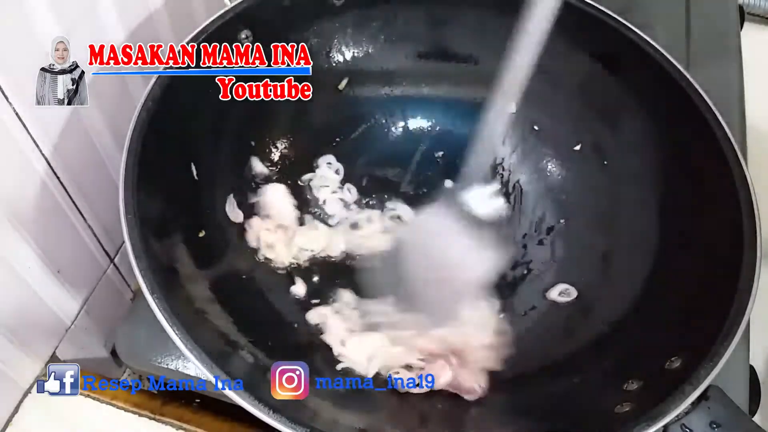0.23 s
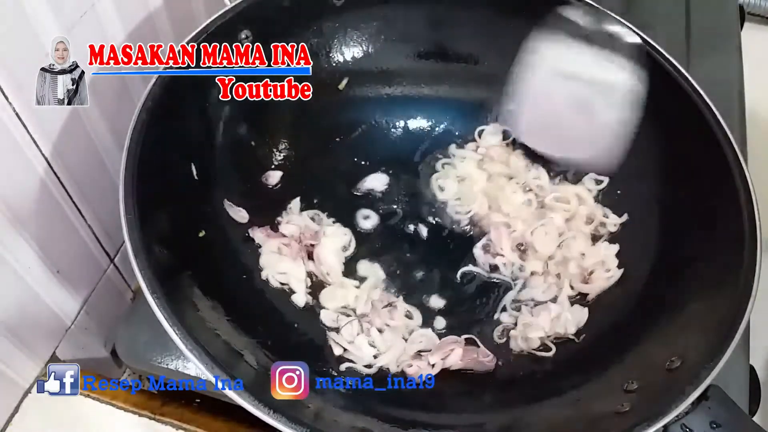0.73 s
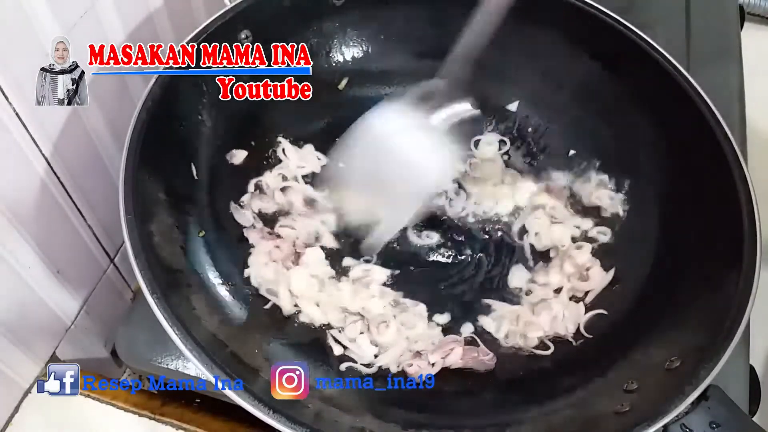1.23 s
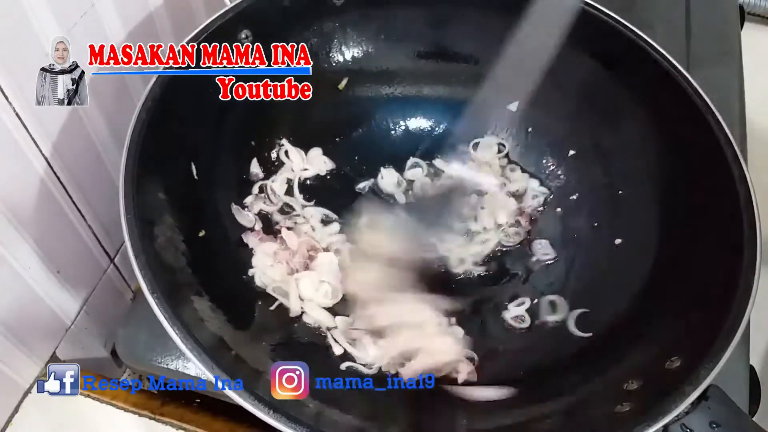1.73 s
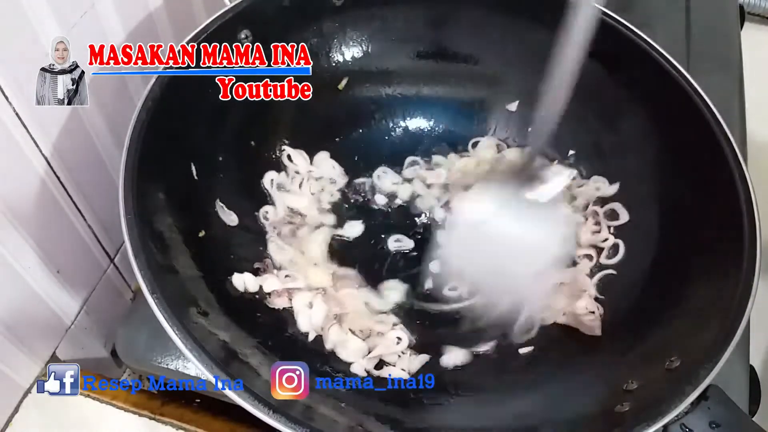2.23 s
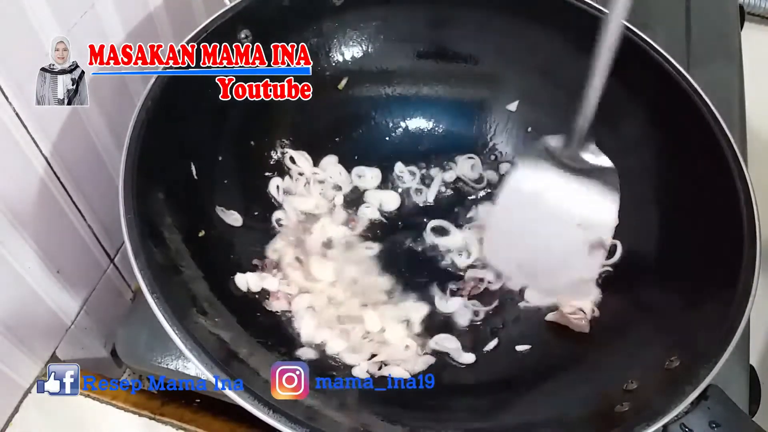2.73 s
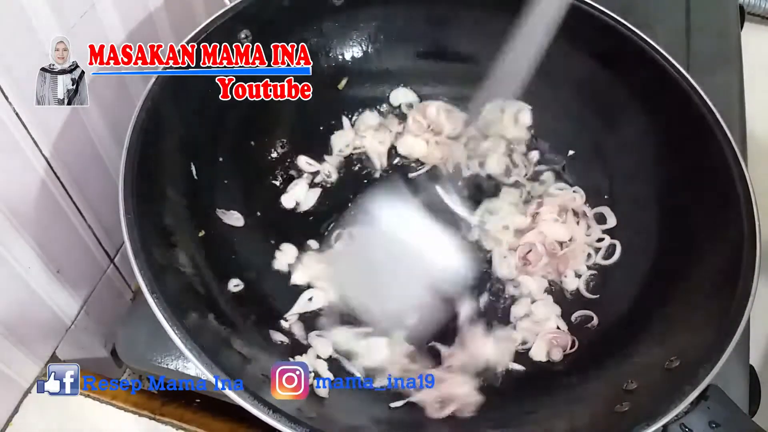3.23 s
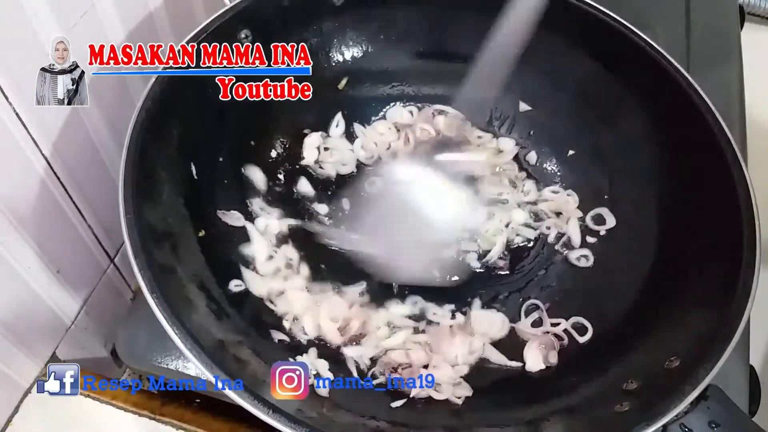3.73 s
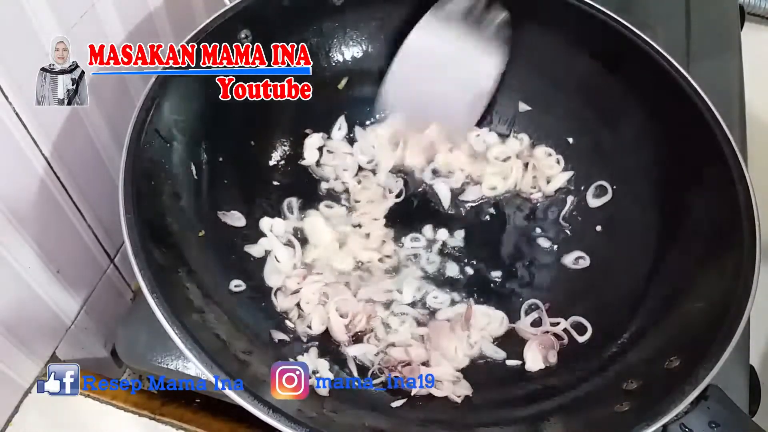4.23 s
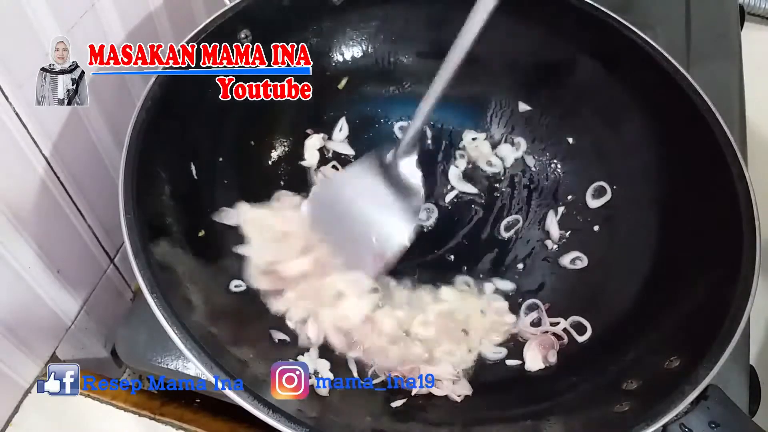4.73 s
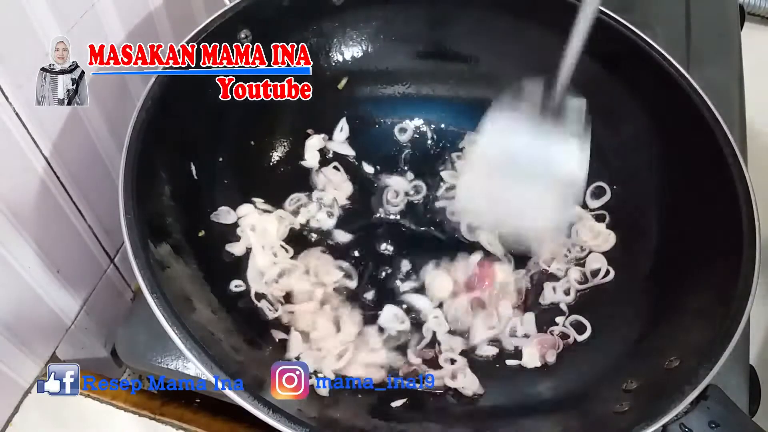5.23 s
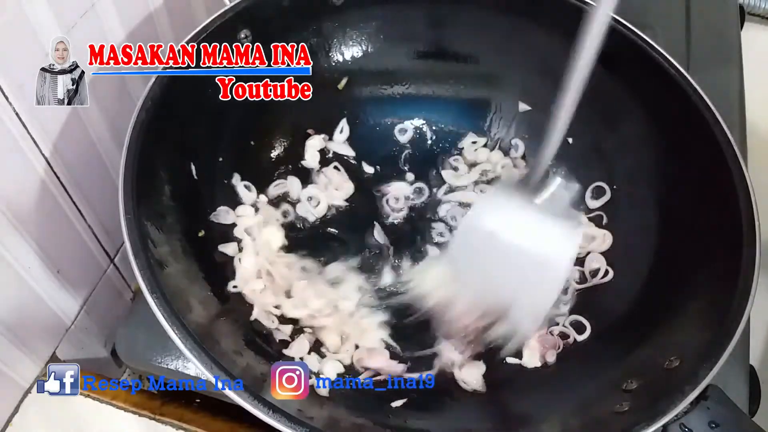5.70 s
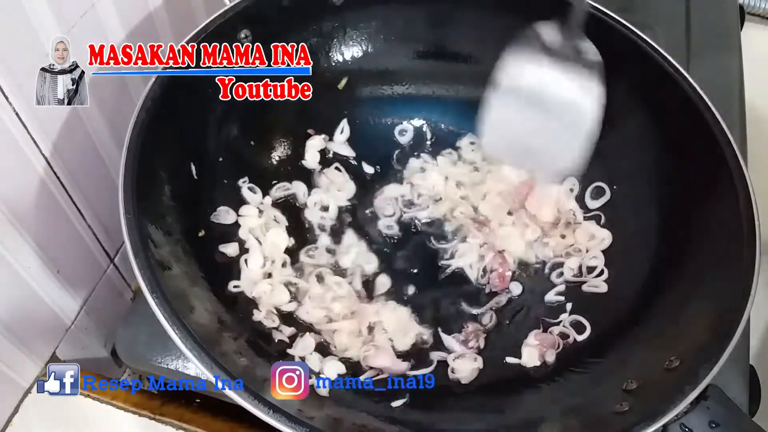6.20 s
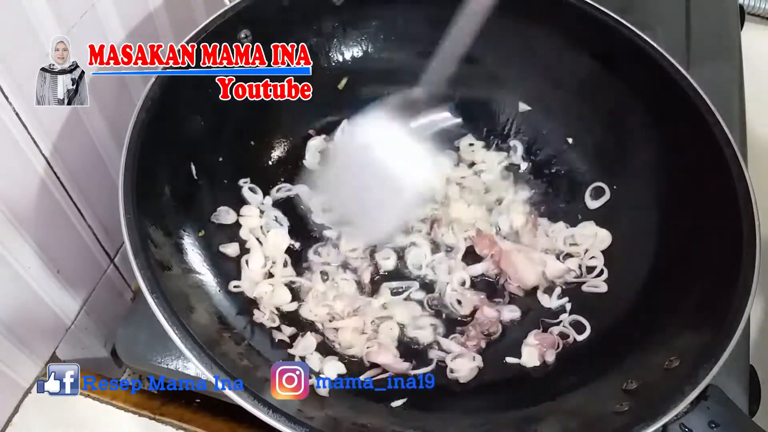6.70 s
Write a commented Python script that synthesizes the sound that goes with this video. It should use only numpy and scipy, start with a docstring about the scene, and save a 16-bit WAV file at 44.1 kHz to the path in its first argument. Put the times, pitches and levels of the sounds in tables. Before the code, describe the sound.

Close, dry kitchen sound of frying: airy sizzle, dense crackling and snapping oil drops throughout. A metal spatula pushes the food around a steel wok, giving a hard clank in the first second, a scraping, squealing clatter before two seconds, then mostly muffled bumps and brief rasps. The burner adds a very quiet low roar and hum, slightly stronger toward the end.

```python
"""Sliced shallots fry in hot oil: a hiss of noise bands, crackle and spits of short rings with spray.
A steel spatula knocks the steel wok (ringing modes), scrapes it (rasp of clicks) and squeals (unsteady sines).
Shoves and jolts shake noise through the modes of the bowl.
Below, a gas burner roars (banded noise) and hums (narrow noise). One close microphone."""
import sys
import numpy as np
from scipy import signal
from scipy.io import wavfile

SR = 44100
rng = np.random.default_rng(int(sys.argv[2]) if len(sys.argv) > 2 else 0)


def pcm_store(signal):
    """Save signal as 16-bit PCM."""
    levels = np.round(np.clip(np.atleast_2d(signal), -1, 1) * 32767)
    wavfile.write(sys.argv[1], SR, levels.astype(np.int16).T)


N = 306936


def from_db(db):
    """Amplitude ratio of a level in dB."""
    return 10 ** (np.asarray(db) / 20)


def rms_one(x):
    """Scale to rms 1."""
    return x / np.sqrt(np.mean(x ** 2) + 1e-20)


def in_time(rows):
    """Columns of a curve in time, one value a sample."""
    s, *columns = np.transpose(rows)
    return [np.interp(np.arange(N) / SR, s, column) for column in columns]


def at_hz(points, hz):
    """Read a spectrum at one frequency, straight lines over log frequency."""
    table = np.array(points)
    return np.interp(np.log(hz), np.log(table[:, 0]), table[:, 1])


def no_bass(x, cutoff_hz):
    """Second-order high-pass."""
    return signal.sosfilt(signal.butter(2, cutoff_hz, "high", fs=SR, output="sos"), x)


def drift(corner_hz):
    """Slow random curve of rms 1: noise through a double one-pole low-pass."""
    step, settle = 20, 2000  # samples per slow point; slow points discarded
    r = np.exp(-2 * np.pi * corner_hz * step / SR)
    noise = rng.standard_normal(N // step + settle + 2)
    slow = signal.lfilter([1], [1, -2 * r, r * r], noise)[settle:]
    return np.interp(np.arange(N) / step, np.arange(len(slow)), rms_one(slow))


def ring(clicks, hz, t60_s):
    """A unit click sets a decaying sine of height 1 ringing."""
    r = from_db(-60 / (t60_s * SR))
    w = 2 * np.pi * hz / SR
    return signal.lfilter([0, np.sin(w)], [1, -2 * r * np.cos(w), r * r], clicks + 1e-18)


def resonances(x, peaks):
    """Parallel resonances with alternating signs."""
    out = 0
    for k, (hz, width_hz, db) in enumerate(peaks):
        out = out + (-1) ** k * from_db(db) * signal.lfilter(*signal.iirpeak(hz, hz / width_hz, SR), x)
    return out


def grains(per_s, spread_db, most=6.5):
    """Random clicks of either sign and very uneven size; rms 1."""
    sizes = from_db(spread_db * np.minimum(rng.exponential(1, N), most))
    signed = sizes * rng.choice([-1, 1], N)
    return rms_one(signed * (rng.random(N) < per_s / SR))


def coloured(sources, spectrum, patchy_db, tilt_db=0):
    """Half-octave bands, neighbours fed by different sources, each flickering on its own; rms about 1."""
    out, power = 0, 0
    edges_hz = 22 * 2 ** np.arange(0, 10, .5)
    for k, (low, high) in enumerate(zip(edges_hz, np.minimum(edges_hz[1:], 19000))):
        hz = np.sqrt(low * high)
        level_db = at_hz(spectrum, hz)
        if level_db > -40:  # weaker bands are left out
            band_pass = signal.butter(2, [low, high], "band", fs=SR, output="sos")
            band = signal.sosfilt(band_pass, sources[k % 2])
            flicker_db = patchy_db * drift(16.5)
            out = out + band * from_db(level_db + flicker_db + tilt_db * np.log2(hz / 6000))
            power += from_db(2 * level_db) * np.mean(band ** 2)
    return out / np.sqrt(power)


def swells(rows, fade_db_per_s):
    """Each row rises in a straight line, holds, then dies away; their powers add."""
    t, power = np.arange(N) / SR, np.zeros(N)
    for start_s, rise_s, hold_s, db in rows:
        i = slice(max(round(start_s * SR), 0), round((start_s + .75) * SR))
        since_s = t[i] - start_s
        rise = np.clip(since_s / max(rise_s, 1e-3), 0, 1)
        fading_s = np.maximum(since_s - rise_s - hold_s, 0)
        power[i] += (rise * from_db(db - fade_db_per_s * fading_s)) ** 2
    return np.sqrt(power)


# roar spectrum: (pitch_hz, level_db_per_hz)
ROAR_SPECTRUM = [(15, -39), (25, -4), (91, 14.5), (166, -2), (209, 4.5), (254, -35), (400, -30), (520, -37),
                 (880, -120)]
# roar level: (time_s, level_db)
FLAME_LEVEL = [(0, -57.5), (1.2, -60), (2.2, -57), (3.2, -61), (4.2, -58.5), (4.9, -55.5), (5.9, -61.5),
               (6.4, -51), (6.96, -52)]
# hum level: (time_s, level_db)
HUM_LEVEL = [(0, -67.5), (3.4, -63), (3.9, -60.5), (6.96, -52)]
HUM_HZ, HUM_WIDTH_HZ = 146, 7
FLAME_WAVER_DB, FLAME_WAVER_HZ = 4.5, 9.0
ROCK_DB = -14.5  # roar swell relative to the shove


def burner():
    """Flame's lumpy roar, swollen as each shove rocks the wok on its ring; narrow noise hums inside it."""
    roar = coloured(rng.standard_normal((2, N)), ROAR_SPECTRUM, patchy_db=.8)
    hum = rms_one(resonances(rng.standard_normal(N), [(HUM_HZ, HUM_WIDTH_HZ, 0)]))
    flame = from_db(in_time(FLAME_LEVEL)[0] + FLAME_WAVER_DB * drift(FLAME_WAVER_HZ))
    rocking = from_db(ROCK_DB) * swells(SHOVES, SHOVE_FADE_DB_PER_S)
    return np.hypot(flame, rocking) * roar + from_db(in_time(HUM_LEVEL)[0]) * hum


# blade shoving the bowl: (start_s, rise_s, hold_s, rumble_db)
SHOVES = [(0, 0.0029, 0.035, -40), (.11, .02, .01, -43.5), (.38, 0.029, 0.031, -46.5),
          (.668, 0.0085, 0.055, -40), (.86, 0.075, .03, -42.5), (1.545, 0.043, .16, -37.5),
          (2.385, 0.022, 0.12, -33.5), (3.435, 0.033, 0.089, -35), (3.65, 0.017, .01, -42),
          (4.54, 0.023, .06, -47), (5.4, 0.033, 0.033, -42), (6.245, 0.032, 0.11, -43.5)]
# short jolts of the bowl: (peak_s, level_db)
JOLTS = [(.13, -41), (.41, -44), (.445, -35), (.68, -35), (1.57, -34), (1.734, -30.5), (2.42, -31),
         (2.47, -35), (3.06, -38), (3.21, -42), (3.469, -31.5), (3.55, -38), (3.703, -31), (4.064, -31.5),
         (4.55, -46), (5.46, -48), (6.33, -47)]
# murmur between shoves: (time_s, level_db)
REST_LEVEL = [(0.0, -44), (0.66, -63), (0.87, -45), (1.36, -64), (1.8, -51), (2.32, -62), (2.62, -43.5),
              (2.81, -59), (6.96, -52)]
# low modes, narrow ones first: (pitch_hz, width_hz, gain_db)
LOW_MODES = [(144.8, 13.4, -3), (180, 8.6, 2), (253.3, 10.6, 6), (329.7, 16.6, 4), (404.5, 43, -0.5),
             (456, 56, 1), (666, 274, -5.5)]
# upper modes, applied twice: (pitch_hz, width_hz, gain_db)
UPPER_MODES = [(866, 224, 8.5), (1065, 122, 13.5), (1520, 450, 9)]
NARROW_MODES = 4
SHOVE_FADE_DB_PER_S, BROAD_FADE_DB_PER_S = 81, 169  # narrow modes outlast the broad ones
JOLT_RISE_S, JOLT_FADE_DB_PER_S, UPPER_REST_DB = 0.005, 502, -57


def bowl():
    """Shoves shake the wok's low modes in lumps, jolts the upper ones; it never quite rests."""
    rest = from_db(in_time(REST_LEVEL)[0] + 2.4 * drift(18.0))
    jolts = [(peak_s - JOLT_RISE_S, JOLT_RISE_S, 0, db) for peak_s, db in JOLTS]
    upper_rest = from_db(UPPER_REST_DB + 5.6 * drift(8.4))
    jolted = np.hypot(swells(jolts, JOLT_FADE_DB_PER_S), upper_rest)
    shakes = grains(1500, spread_db=1.5) + 1.2 * rng.standard_normal(N)
    narrow = resonances(shakes, LOW_MODES[:NARROW_MODES])
    broad = resonances(shakes, LOW_MODES[NARROW_MODES:])
    lumps = from_db(1.96 * drift(30.0)) / np.std(narrow + broad)
    low = np.hypot(swells(SHOVES, SHOVE_FADE_DB_PER_S), rest) * narrow
    low = low + np.hypot(swells(SHOVES, BROAD_FADE_DB_PER_S), rest) * broad
    upper = rms_one(resonances(resonances(shakes, UPPER_MODES), UPPER_MODES))
    return lumps * low + jolted * upper


# tones of the edge: (middle_s, half_length_s, pitch_hz, level_db, unsteadiness_hz)
SQUEALS = [(0.402, 0.041, 2210, -28, 152), (0.406, 0.058, 1030, -35.5, 80), (0.439, 0.024, 2150, -21, 119),
           (0.92, 0.02, 4790, -29, 500), (1.575, 0.017, 2890, -26, 120), (1.592, 0.046, 4120, -28, 120),
           (1.608, 0.0196, 2225, -26, 200), (1.638, 0.025, 2170, -25.5, 100), (1.674, .025, 2276, -31, 150),
           (1.685, 0.034, 5030, -40, 150), (1.73, 0.018, 4500, -16.5, 500), (1.739, 0.032, 1554, -32, 80),
           (1.746, 0.027, 6000, -25, 200), (4.213, 0.018, 2500, -32.5, 390),
           (5.462, 0.043, 4260, -27.5, 200), (5.464, 0.023, 1880, -24.5, 25), (5.471, 0.054, 890, -39, 60),
           (5.478, 0.044, 6100, -26.5, 400), (6.483, 0.02, 6000, -22.5, 300)]


def squeals():
    """The edge sticks and slips and one mode sings: brief tones swell and fade with shivering pitch."""
    out, shiver, flutter = np.zeros(N), drift(400), from_db(3.0 * drift(150))
    for middle_s, half_s, hz, db, unsteady_hz in SQUEALS:
        span = slice(round((middle_s - half_s) * SR), round((middle_s + half_s) * SR))
        phase = 2 * np.pi * np.cumsum(hz + unsteady_hz * shiver[span]) / SR
        out[span] += from_db(db) * np.hanning(len(phase)) * flutter[span] * np.sin(phase)
    return out


# blade sliding on steel: (start_s, rise_s, hold_s, scrape_db)
STROKES = [(.29, .02, 0.054, -34.5), (.385, .008, 0.025, -28.5), (.89, .024, .004, -29),
           (1.564, .005, .03, -24), (1.61, 0.081, 0.017, -22), (1.69, 0.036, .004, -23),
           (2.382, 0.017, 0.0082, -24), (3.43, .03, 0.017, -37), (5.432, .02, .04, -25)]
# rasp spectrum, also the clatter of knocks: (pitch_hz, level_db_per_hz)
SCRAPE_SPECTRUM = [(350, -41.5), (600, -40), (906, -9), (1290, -20.5), (1850, -7), (3630, -8.5), (4160, 0),
                   (16000, -16)]
STROKE_FADE_DB_PER_S = 240


def strokes():
    """Dense catches of the edge rasp along the steel and ring the blade."""
    scrape = swells(STROKES, STROKE_FADE_DB_PER_S)
    catches = [grains(4000 * from_db(4.4 * drift(60)), spread_db=3.0) for _ in range(2)]
    rasp = coloured(catches, SCRAPE_SPECTRUM, patchy_db=1.5)
    # the pressed blade rings short; its modes come and go as the contact point wanders
    damped = 0
    for k, (hz, db, t60_s) in enumerate(BLADE_MODES):
        wander_db = 3.0 * drift(30)
        damped = damped + ring(from_db(.5 * db + wander_db) * catches[k % 2], hz, .3 * t60_s)
    return scrape * (rasp + from_db(-5) * rms_one(damped))


# blade on bowl: (start_s, blow_db, clatter_decay_s)
KNOCKS = [(.1237, -19, 0.008), (.672, -1.5, 0.028), (.699, -31, 0.0094), (1.568, -30, 0.012),
          (1.6781, -11.5, 0.006), (1.73, -14, .012)]
# blade modes, also rung by strokes: (pitch_hz, level_db, t60_s)
BLADE_MODES = [(851, -17, .12), (1040, -20, .08), (1570, -19, .15), (1826, -9, .18), (2190, -6, .16),
               (2245, -7, .18), (2340, -3, .11), (2630, -13, .1), (3255, -11, .16), (3316, -9, .25),
               (3715, -10, .13), (4050, -10, .11), (4305, -6, .1), (4600, -11, .16), (4660, -8, .13),
               (5005, -7, .2), (5030, 0, .12), (5180, -3, .09), (5325, -2, .11), (5650, -3, .09),
               (6540, -11, .08), (7460, -12, .08), (7910, -5, .09), (8190, -10, .08)]


def knocks():
    """Blade hits bowl: the blow rings every mode, a moment of chatter roughens the ring and clatters."""
    t = np.arange(N) / SR
    blows, chatter = np.zeros(N), np.zeros(N)
    for start_s, db, decay_s in KNOCKS:
        blows[round(start_s * SR)] = from_db(db)
        chatter += (t >= start_s) * from_db(db) * np.exp(-np.maximum(t - start_s, 0) / decay_s)
    touches = from_db(-12) * blows + from_db(-45) * chatter * grains(4000, spread_db=3.0)
    rung = 0
    for k, (hz, db, t60_s) in enumerate(BLADE_MODES):
        rung = rung + (-1) ** k * ring(from_db(db) * touches, hz, t60_s)
    noise = coloured(rng.standard_normal((2, N)), SCRAPE_SPECTRUM, patchy_db=1.0)
    clatter = from_db(-13) * chatter * noise
    return no_bass(rung + clatter, 1000)


SMALL_SPITS = 95
SMALL_SPIT_MAX_DB, SMALL_SPIT_RANGE_DB = -11, 9
SMALL_SPIT_MIN_HZ, SMALL_SPIT_RANGE_OCTAVES = 5000, 1.5


def small_spits():
    """Weaker spits at chance moments, as rows like LOUD_SPITS."""
    when, size, pitch = rng.random((SMALL_SPITS, 3)).T
    start_s = .01 + when * (N / SR - .02)
    peak_db = SMALL_SPIT_MAX_DB - SMALL_SPIT_RANGE_DB * size
    pitch_hz = SMALL_SPIT_MIN_HZ * 2 ** (SMALL_SPIT_RANGE_OCTAVES * pitch)
    return list(zip(start_s, peak_db, pitch_hz))


# loudest spits of oil: (start_s, peak_db, pitch_hz)
LOUD_SPITS = [(0.1255, -5, 3870), (0.1627, -8, 12600), (0.2388, 3, 12500), (0.2658, 8, 6700),
              (0.3291, -6, 5300), (0.3639, 2.5, 7700), (0.3693, -7, 6740), (0.4826, 0, 9800),
              (0.5418, -4.5, 11600), (0.6196, -9, 7950), (0.6267, -4, 11700), (0.6695, -12, 8100),
              (0.7689, -1.5, 8600), (0.8817, -3, 9760), (0.9564, -7, 5240), (1.0298, -8, 6100),
              (1.1107, -9.5, 4780), (1.1472, -2, 9500), (1.1639, 1, 9000), (1.5524, -3, 8700),
              (1.6604, -11, 6900), (1.7322, 6.5, 4700), (1.885, -9, 9300), (1.9477, -1, 7800),
              (1.974, -2, 10900), (2.0868, 1.5, 9200), (2.095, 8.5, 13000), (2.2139, -4, 7600),
              (2.3129, 0, 9800), (2.3388, 3, 9300), (2.3905, 1, 12000), (2.4527, -3, 10100),
              (2.4941, 3.5, 13000), (2.5282, 0, 10000), (2.5798, -3, 7760), (2.601, -8, 8100),
              (2.6722, -6, 11500), (2.6856, -2, 8500), (2.817, -6, 11300), (2.9151, -4, 12000),
              (2.9563, -2, 10200), (2.9644, -7, 11300), (3.0901, -5, 7100), (3.1308, -1, 10900),
              (3.1946, -1, 11600), (3.2457, 1, 6800), (3.2985, 4.5, 13000), (3.3155, -7, 4550),
              (3.3265, -9, 10500), (3.3575, -2, 7450), (3.3617, -3, 8400), (3.4021, 0, 6530),
              (3.5498, -3, 10000), (3.5807, -3, 10600), (3.6011, -5, 10900), (3.652, 0, 7100),
              (3.7041, 9, 5160), (3.897, 1.5, 12000), (4.0638, 3.5, 6400), (4.0669, 6, 5860),
              (4.1165, -7, 7900), (4.2119, -9, 2900), (4.5437, -1.5, 5900), (4.7585, -4, 10000),
              (4.7775, 1, 13000), (4.8711, 3, 8700), (4.9482, 0.5, 12500), (5.119, -3, 8500),
              (5.1871, -9, 9900), (5.3166, -3, 10400), (5.3244, -1.5, 5900), (5.4339, -2, 6000),
              (5.5665, -12, 7500), (5.7413, -12, 9000), (5.7985, -6, 7700), (5.835, -9, 8100),
              (5.9276, -4, 8000), (6.0116, -1, 7300), (6.4768, 0, 5860), (6.5909, -8, 7240),
              (6.7564, -2, 12100), (6.785, -1, 12500), (6.8527, -1, 7600), (6.8611, -7, 7650)]


def spits():
    """A bursting drop: a snap, a few cycles at its cavity's pitch, a wisp of spray; too small for bass."""
    out, t = np.zeros(N + 2000), np.arange(400) / SR
    drops = small_spits() + list(LOUD_SPITS)
    sprays = rng.standard_normal((len(drops), len(t)))
    for (start_s, db, hz), spray in zip(drops, sprays):
        cavity = ring(t == 0, hz, 4.8 / hz)
        snap = from_db(-3.5) * np.diff(spray, prepend=0) * np.exp(-t / .0001)
        wisp = from_db(-23.5) * ring(spray * np.exp(-t / 0.004), hz, 2.0 / hz)
        pop = no_bass(cavity + snap + wisp, 0.5 * hz)
        out[round(start_s * SR) - 3:][:len(t)] += from_db(db) * pop / np.abs(pop).max()
    return out[:N]


def crackle():
    """Larger bubbles burst in flurries, each ringing a few cycles at a pitch of its own; rms 1."""
    bursts = grains(1100 * from_db(5 * drift(25)), spread_db=3.0, most=4.67)
    pitches_hz, dealt = np.geomspace(2500, 15000, 14), rng.integers(0, 14, N)
    rings = 0
    for k, hz in enumerate(pitches_hz):
        rings = rings + (hz / 6000) ** 0.59 * ring(bursts * (dealt == k), hz, 2.0 / hz)
    return rms_one(no_bass(rings, 1840))


# vigour of the frying: (time_s, sizzle_db, tilt_db_per_octave about 6 kHz)
FRY = [(0.0, -37, -2.5), (0.19, -34.5, 1), (0.39, -27.5, -2), (0.54, -32, 1.5), (1.2, -36, 1.5),
       (1.47, -36.5, 1.5), (1.78, -30, 0), (2.36, -33, 0.5), (2.58, -32.5, 2), (2.96, -32, 1),
       (3.47, -29.5, 0), (4.57, -34.5, 0.5), (5.54, -34, 3), (5.87, -35.5, 0), (6.75, -31, 0.5),
       (6.96, -31, -1)]
# hiss spectrum: (pitch_hz, level_db_per_hz)
HISS_SPECTRUM = [(290, -78), (500, -10), (1080, 0.5), (1260, -3.5), (2130, 5), (7000, 9), (8090, 0),
                 (9220, 7), (15100, 3.5), (16000, -10)]


def sizzle():
    """Countless tiny steam bubbles make a hiss under the crackle."""
    level_db, tilt_db = in_time(FRY)
    unsteady_db = .7 * drift(40)
    hiss = coloured(rng.standard_normal((2, N)), HISS_SPECTRUM, patchy_db=2.52, tilt_db=tilt_db)
    return from_db(level_db) * (from_db(unsteady_db + 0.5) * hiss + from_db(-0.5) * crackle())


# two faint later copies of the frying: (delay_s, level_db)
FRYING_COPIES = [(.0032, -21.5), (.008, -15.5)]


def scene():
    """All sources; sizzle and spits are each repeated faintly twice within 8 ms; both channels alike."""
    frying = sizzle() + spits()
    copies = sum(from_db(db) * np.roll(frying, round(delay_s * SR)) for delay_s, db in FRYING_COPIES)
    mono = burner() + bowl() + squeals() + strokes() + knocks() + frying + copies
    return np.array([mono, mono])


# microphone port, a peak then a dip: (pitch_hz, width_hz, gain_db)
PORT = [(8180, 440, -3.5), (9200, 3300, -8)]
CUTOFF_HZ = 15900


def record(dry):
    """The microphone port colours the treble, deep bass is lost, peaks are rounded, the top is cut."""
    heard = no_bass(dry + resonances(dry, PORT), 27)
    top_cut = signal.ellip(10, .5, 70, CUTOFF_HZ, fs=SR, output="sos")
    return signal.sosfilt(top_cut, np.tanh(heard))


dry = scene()
out = record(dry)
pcm_store(out)
```